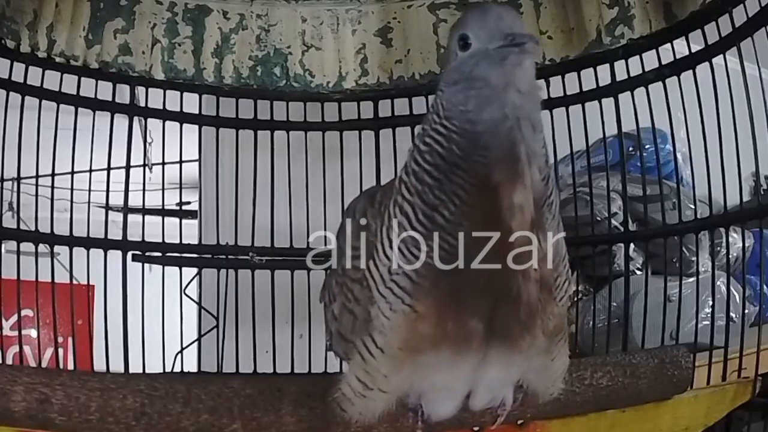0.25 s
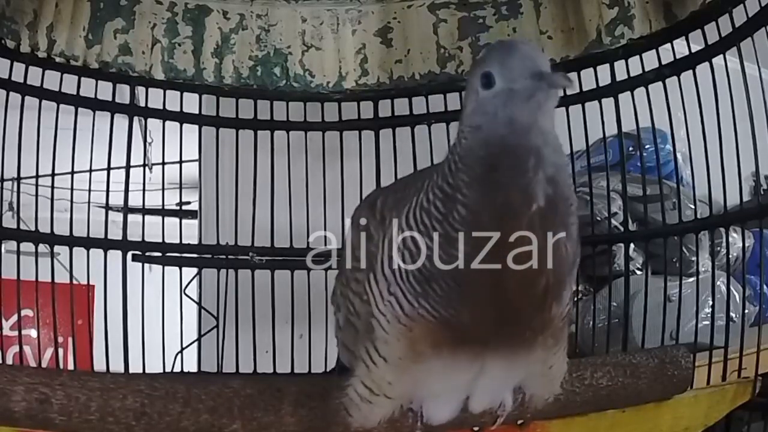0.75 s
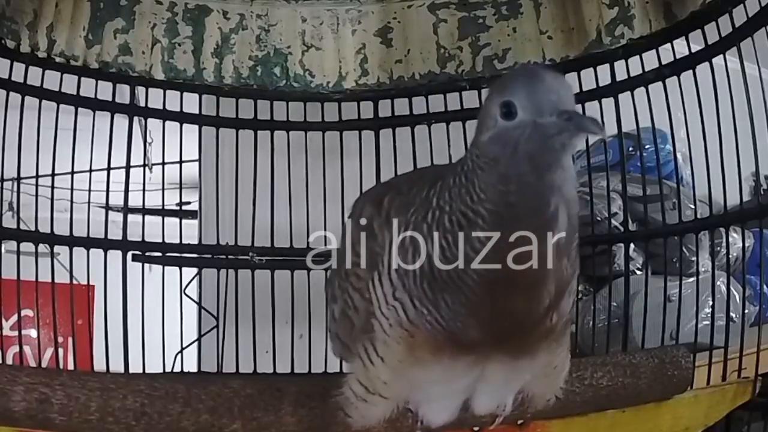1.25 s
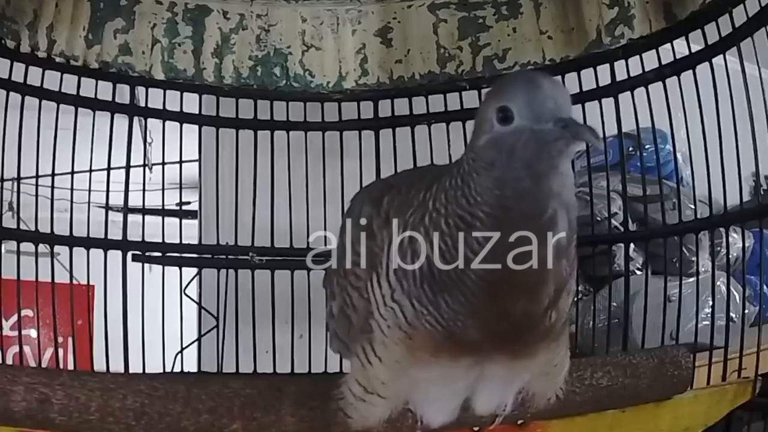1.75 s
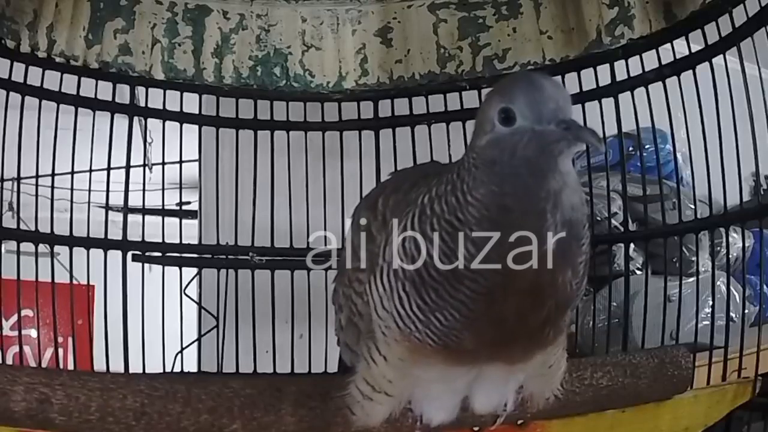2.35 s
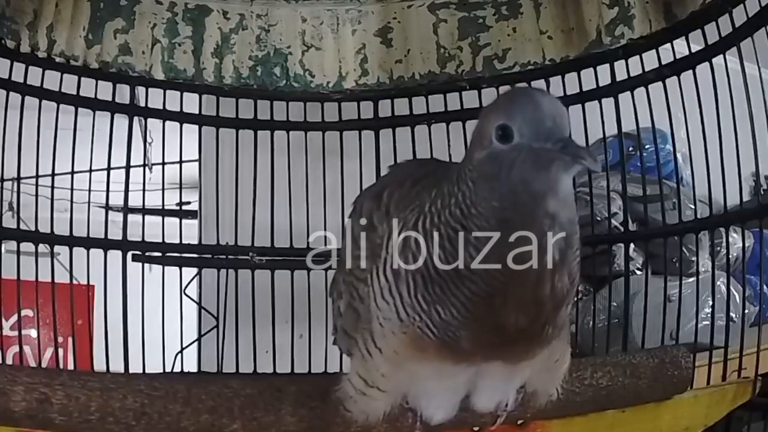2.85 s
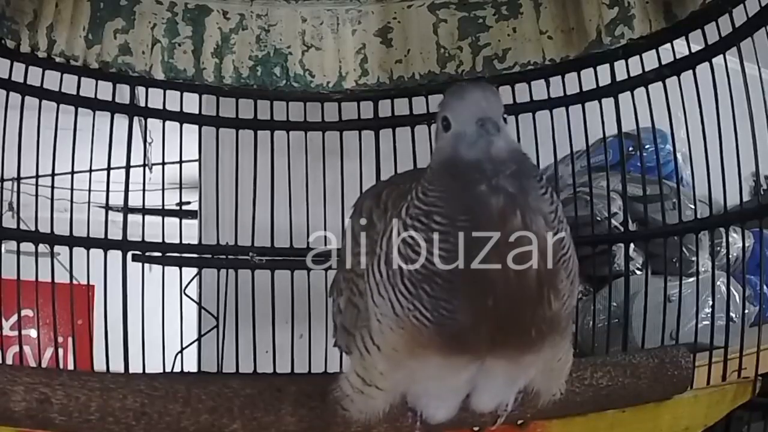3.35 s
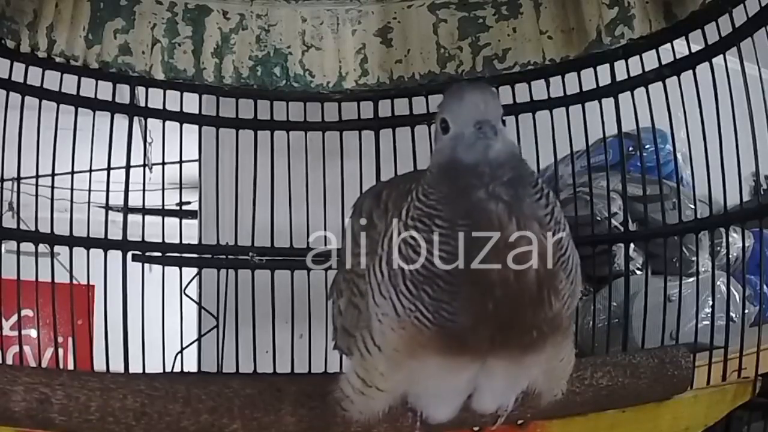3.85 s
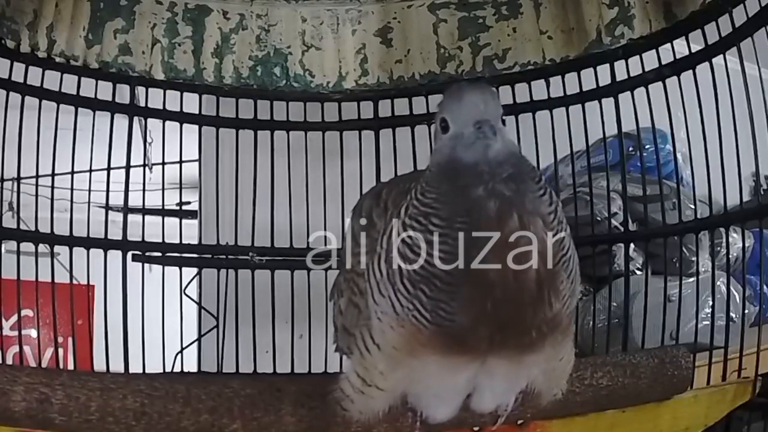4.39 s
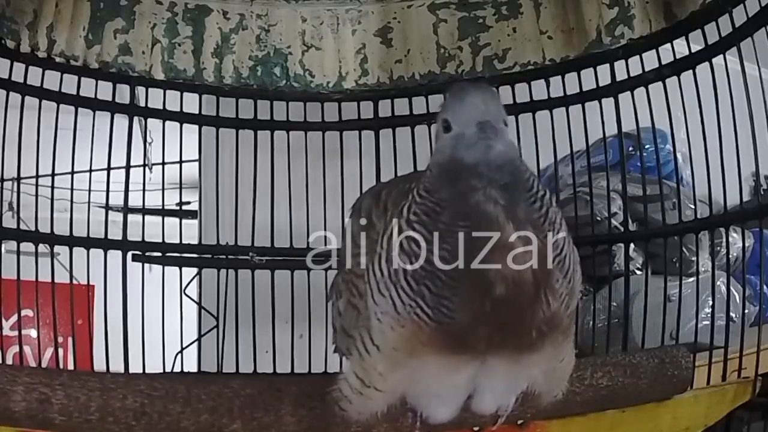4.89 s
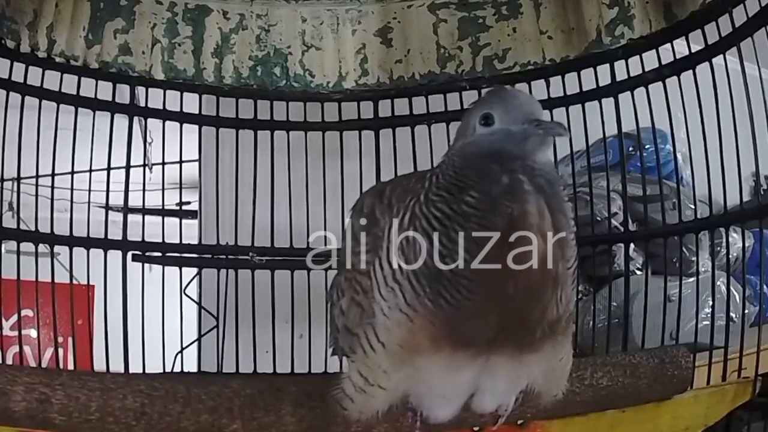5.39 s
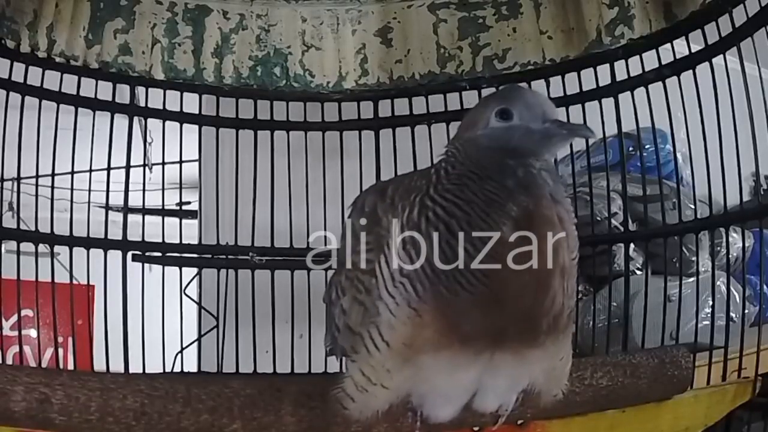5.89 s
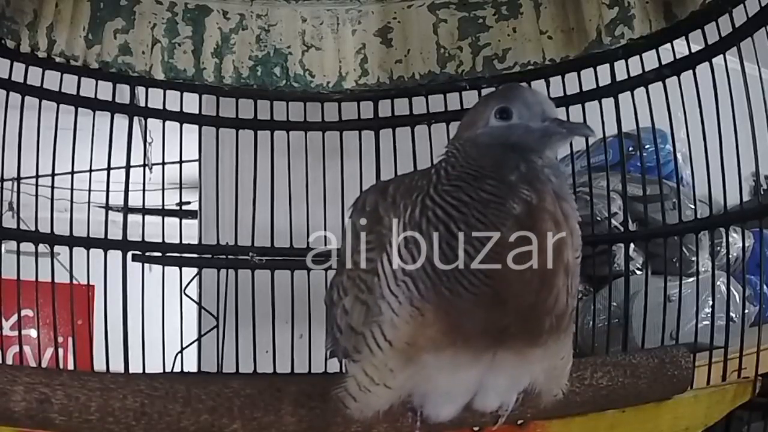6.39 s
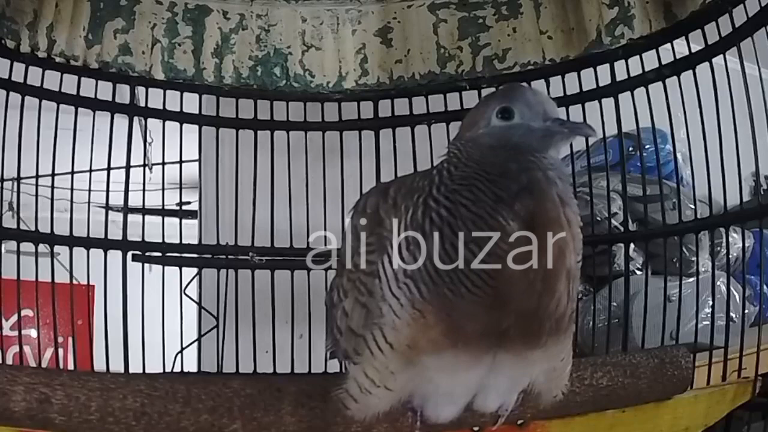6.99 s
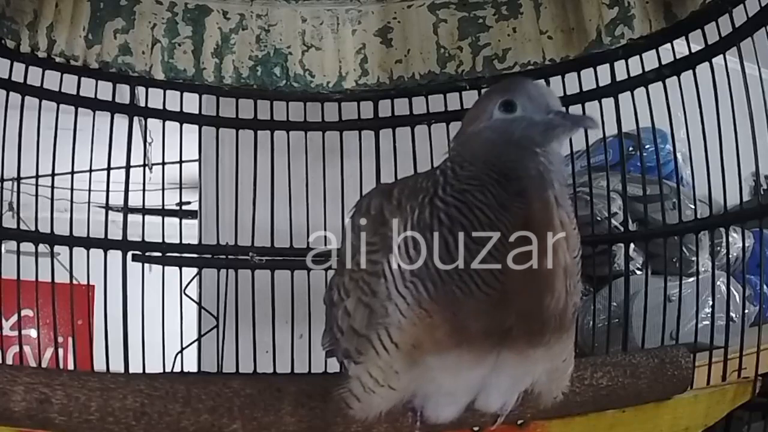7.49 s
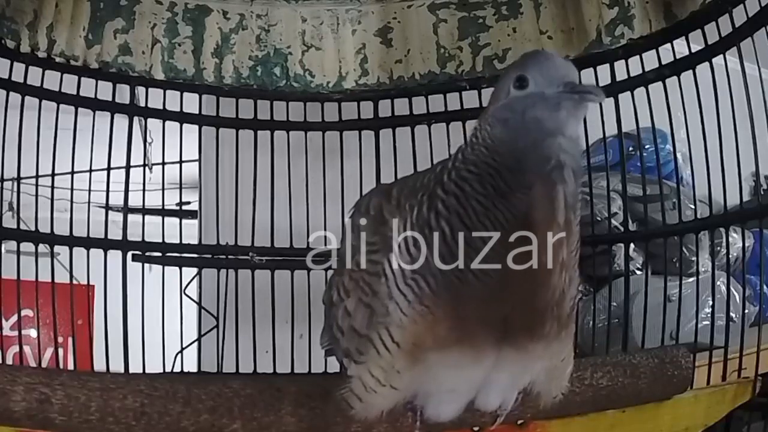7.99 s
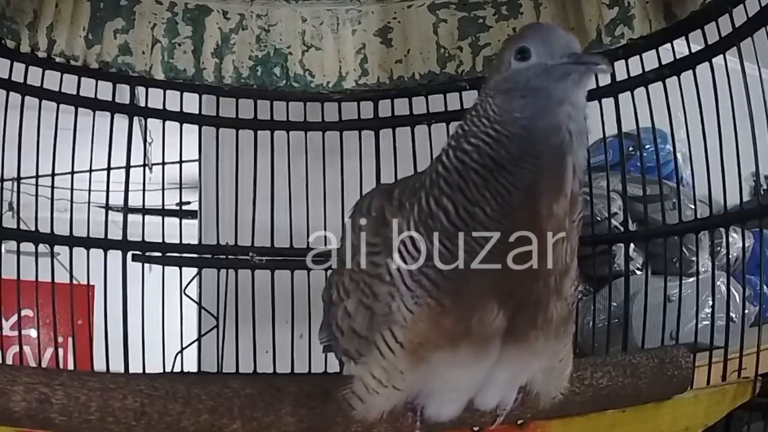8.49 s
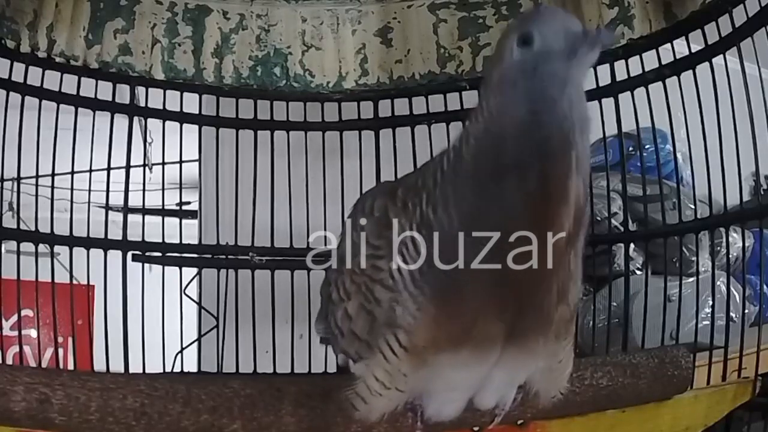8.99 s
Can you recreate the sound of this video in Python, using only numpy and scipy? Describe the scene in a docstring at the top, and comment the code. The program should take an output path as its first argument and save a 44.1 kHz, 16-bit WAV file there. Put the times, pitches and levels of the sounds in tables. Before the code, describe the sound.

A caged dove close to the microphone gives four short round coos and a long one that sinks and fades. Other doves in the echoing yard hoot and stutter, and a nearer one trills twice, each time slowing to a drawn-out note. Low traffic and two motorbikes hum behind; one fades, a heavy vehicle rumbles past, the other pulls away. A single loud coo ends it.

```python
"""Traffic hums and two motorbikes run from the start, while doves hoot and stutter across a walled yard.
A caged zebra dove coos close by, four short notes and a long sinking one; a far small bird whistles.
A second dove nearby trills twice, one motorbike fades, a heavy vehicle rumbles past, the other pulls away.
A faint treble hiss rises and falls before a last coo. Birds are jittered tones, engines sums of firing-rate
multiples, tyres, feathers and hiss shaped noise; echoes give distance, a limiter ducks all under loud coos."""
import sys
import numpy as np
from scipy import signal
from scipy.fft import rfft, irfft, next_fast_len
from scipy.io import wavfile
from scipy.ndimage import uniform_filter1d, map_coordinates

SR = 44100
rng = np.random.default_rng(int(sys.argv[2]) if len(sys.argv) > 2 else 0)


def put_to_file(sound):
    """Save the sound as 16-bit audio at rate SR, in the file named by the first command-line argument."""
    columns = np.atleast_2d(sound).T  # one column per channel
    safe = np.clip(columns, -1, 1)
    whole_steps = np.round(safe * 32767)
    wavfile.write(sys.argv[1], SR, whole_steps.astype(np.int16))


N = 407475


def amp(db):
    """Decibels to gain."""
    return 10 ** (np.asarray(db) / 20)


def unit(x):
    """x at rms 1."""
    return x / np.sqrt(np.mean(x ** 2) + 1e-20)


def along(points, hz):
    """Interpolate (frequency [Hz], value) points on a log-frequency axis."""
    f, v = np.transpose(points)
    return np.interp(np.log(hz + 1), np.log(f + 1), v)


def curves(rows):
    """One value per sample for each column after the time."""
    s, *cols = np.transpose(rows)
    return [np.interp(np.arange(N) / SR, s, c) for c in cols]


def wobble(rate, size=N):
    """A smooth random curve, rate knots a second."""
    knots = rng.standard_normal(int(size * rate / SR) + 4)
    coarse = np.arange(0, size + 32, 32)
    smooth = map_coordinates(knots, [coarse * rate / SR])
    return np.interp(np.arange(size), coarse, smooth)


def bell(at, half):
    """A bell-shaped curve around a time, 1/e at half seconds either side."""
    return np.exp(-((np.arange(N) / SR - at) / half) ** 2)


def filtered(x, response):
    """x times a response of frequency."""
    m = next_fast_len(N + SR // 2)
    return irfft(rfft(x, m) * response(np.fft.rfftfreq(m, 1 / SR)), m)[..., :N]


def add(track, start, sound):
    """Mix a sound into a track at a time."""
    at = round(start * SR) + np.arange(len(sound))
    inside = (at >= 0) & (at < N)
    track[at[inside]] += sound[inside]


# left-right likeness of diffuse noise: (frequency [Hz], correlation [-1..1])
LIKENESS = [(100, 1), (1000, 0.99), (2200, 0.99), (3200, 0.54), (4800, 0.019), (9000, 0.04)]


def rush(spectrum):
    """Stereo noise of rms 1, alike in both ears in the bass: mid and side share the power."""
    def mid_side(hz):
        turn = np.arccos(np.clip(along(LIKENESS, hz), -1, 1)) / 2
        return amp(along(spectrum, hz)) * np.array([np.cos(turn), np.sin(turn)])
    mid, side = filtered(rng.standard_normal((2, N)), mid_side)
    return unit(np.array([mid + side, mid - side]))


def note(length, first_hz, last_hz, scoop, rise, bend, fall, attack, release):
    """Time, pitch and loudness: pitch scoops up as pressure builds and bends as the note is let go."""
    t = np.arange(int(max(length, .01) * SR)) / SR
    left = t[-1] - t
    bends = 1 - scoop * np.exp(-t / rise) + bend * np.exp(-left / fall)
    pitch = np.linspace(first_hz, last_hz, len(t)) * bends
    opening = np.sin(np.pi / 2 * np.minimum(t / attack, 1))
    closing = np.sin(np.pi / 2 * np.minimum(left / release, 1))
    return t, pitch, (opening * closing) ** 2


def arch(length, low_hz, peak_hz, last_hz, climb, sinking, attack, release):
    """Time, pitch and loudness of a note that lingers low, climbs to a peak and sinks again."""
    t, _, gate = note(length, peak_hz, peak_hz, 0, 1, 0, 1, attack, release)
    below = np.exp(-(2 * t / max(climb, .002)) ** 2)
    sunk = np.clip((t - climb) / max(t[-1] - climb, .005), 0, 1) ** sinking
    pitch = peak_hz + (low_hz - peak_hz) * below + (last_hz - peak_hz) * sunk
    return t, pitch, gate


def syrinx(pitch, tone, jitter, effort=1):
    """A tone of rms 1 with a slight tremor; effort brings out its faint, unsteady overtones."""
    flutter_db = 1.5
    size = len(pitch)
    phase = 2 * np.pi * np.cumsum(pitch * (1 + jitter * wobble(250, size))) / SR
    overtones = sum(amp(db + flutter_db * wobble(40, size)) * np.sin(order * phase)
                    for order, db in enumerate(tone, 2))
    return np.sqrt(2) * (np.sin(phase) + effort * overtones)


def ping(hz, width, life):
    """A short burst of noise around hz that swells for life seconds and dies."""
    t = np.arange(SR // 10) / SR
    in_phase = wobble(width, len(t)) * np.sin(2 * np.pi * hz * t)
    quadrature = wobble(width, len(t)) * np.cos(2 * np.pi * hz * t)
    return (in_phase + quadrature) * t / life * np.exp(1 - t / life)


# noise spectra, relative, of engine rumble, tyres and a heavy engine: (frequency [Hz], level [dB])
RUMBLE_SPECTRUM = [(15, -39.5), (30, -17), (56, -0.5), (120, 1.5), (185, 0.5), (215, -2), (245, -0.5),
                   (320, -3), (380, -10), (600, -13), (900, -57.5)]
TYRE_SPECTRUM = [(250, -18), (450, 1), (550, 5), (900, 3), (1500, -7.5), (2100, -9), (2700, -13),
                 (3250, -21.5), (3800, -22.5), (4300, -28.5), (6000, -33), (9500, -37.5), (12500, -50.5),
                 (15000, -66.5)]
HEAVY_SPECTRUM = [(25, -30), (55, 12), (85, 9.5), (140, -12), (250, -46.5)]
# slow changes in traffic noise: (centre [s], half width [s], rumble change [dB], tyre change [dB])
TRAFFIC_CHANGES = [(1.104, 0.74, 0, 3), (5.5, 0.86, 6, 4.5), (6.7, 2.8, -1, 4), (8.85, 0.5, 8.5, 4.5)]


def street():
    """Engine rumble and tyre noise slowly change in level; a heavy vehicle passes slowly."""
    rumble_db = -36 + 2.1 * wobble(8.8)
    tyre_db = -44 + 1.5 * wobble(7.8)
    for at_s, half_s, rumble_change_db, tyre_change_db in TRAFFIC_CHANGES:
        rumble_db += rumble_change_db * bell(at_s, half_s)
        tyre_db += tyre_change_db * bell(at_s, half_s)
    heavy = amp(-38.5) * bell(at=6.1, half=3.5) * rush(HEAVY_SPECTRUM)
    return amp(rumble_db) * rush(RUMBLE_SPECTRUM) + amp(tyre_db) * rush(TYRE_SPECTRUM) + heavy


FIRING_SCATTER_CYCLES, THROB_DB = .0025, .7  # unevenness of the firings in time and strength


def exhaust(rate, tones_db, fading_db):
    """Multiples of an uneven firing rate; each tone fades slowly as the path changes."""
    turns = np.cumsum(rate * (1 + .001 * wobble(6))) / SR + FIRING_SCATTER_CYCLES * wobble(25)
    tones = 0
    for multiple, db in tones_db:
        level_db = db + fading_db * wobble(2.0) + THROB_DB * wobble(12)
        tones = tones + amp(level_db) * np.sin(2 * np.pi * multiple * turns + rng.normal(0, 0.71))
    return np.sqrt(2) * amp(THROB_DB * wobble(25)) * tones


# engine speed: (time [s], firing rate [1/s])
FAR_FIRING_RATE = [(0, 36.4), (2.2, 37.4), (3.2, 37.9), (5.2, 37)]
# loudness: (time [s], level [dB])
FAR_LOUDNESS = [(0, -37.5), (1, -34), (2.2, -35), (3.2, -49.5), (4.3, -41), (5.2, -53.5)]
# exhaust tones from twice the firing rate up, relative: level [dB]
FAR_EXHAUST_TONES = [-20, -16.5, -9, -5.5, -10, -14.5, -15, -21.5, -19]


def far_motorbike():
    """A steady engine, a stack of firing-rate multiples, fades away down the street."""
    (rate,), (db,) = curves(FAR_FIRING_RATE), curves(FAR_LOUDNESS)
    tones = [(k, db + tone_db) for k, tone_db in enumerate(FAR_EXHAUST_TONES, 2)]
    return exhaust(rate, tones, fading_db=2.5)


# engine speed, idling then pulling away: (time [s], firing rate [1/s])
NEAR_FIRING_RATE = [(0, 24.6), (2.6, 25.2), (4.2, 25.2), (4.9, 25.6), (5.8, 25.8), (6.2, 25.2),
                    (7.1, 24.85), (7.48, 25.1), (8.19, 27.1), (8.41, 28.1), (8.97, 29.3), (9.24, 30.2)]
# two strongest tones: (time [s], sixth multiple level [dB], seventh multiple level [dB])
NEAR_STRONG_TONES = [(0, -46.5, -50.5), (.7, -40.5, -53.5), (1.3, -44.5, -49), (2.7, -37.5, -51),
                     (3.1, -49, -53.5), (4.2, -40, -52.5), (5.4, -38.5, -37), (5.85, -45, -35),
                     (6.3, -44.5, -29), (6.82, -30.5, -33.5), (7.45, -27, -24), (8.18, -34.5, -22.5),
                     (8.41, -30, -27), (8.98, -27.5, -29), (9.24, -37, -44)]
# exhaust pipe resonances: (frequency [Hz], gain [dB])
NEAR_PIPE_RESONANCES = [(50, -7.5), (75, -8.5), (100, -6.5), (125, 1), (200, -5), (225, -9.5), (252, -2),
                        (278, -8.5), (305, -0.5), (330, -2), (365, -15.5), (425, -18), (468, -9),
                        (510, -15.5)]


def near_motorbike():
    """Two strong tones; weaker ones slide through fixed pipe resonances as the engine speeds up."""
    (rate,), (sixth_db, seventh_db) = curves(NEAR_FIRING_RATE), curves(NEAR_STRONG_TONES)
    loud_db = 10 * np.log10(amp(sixth_db) ** 2 + amp(seventh_db) ** 2)
    weak_db = -40 + .55 * (loud_db - loud_db.max())  # weak tones follow part of the swell
    strong = [(6, sixth_db), (7, seventh_db)]
    weak = [(k, weak_db + along(NEAR_PIPE_RESONANCES, k * rate))
            for k in range(2, 20) if k not in (6, 7)]
    return exhaust(rate, strong, fading_db=0.96) + exhaust(rate, weak, fading_db=3.5)


# level hoots, and level stretches within a falling coo and a slur:
# (start [s], length [s], pitch [Hz], level [dB])
LEVEL_NOTES = [(-.1, 0.14, 1146, -19.5), (-.05, 0.24, 928, -28.5), (0.814, 0.038, 1010, -12),
               (.97, .06, 846, -28.5), (1.11, 0.1, 851, -16.5), (1.403, .035, 1052, -22),
               (1.664, 0.13, 906.5, -23), (2.11, 0.15, 1156, -24.5), (3.258, 0.057, 823, -23.5),
               (3.394, .11, 839, -17.5), (4.54, 0.08, 912, -23), (4.779, 0.043, 907, -23),
               (4.99, 0.021, 905, -24), (5.077, 0.047, 908, -24.5), (5.253, 0.038, 905, -24.5),
               (6.133, 0.047, 818, -22.5), (6.275, 0.087, 841.7, -15.5), (6.347, 0.034, 967, -21),
               (6.421, .065, 1062, -21.5), (6.607, 0.033, 905, -26.5), (6.704, 0.2, 911, -26)]
# slow upward slurs: (start [s], climb time [s], hold [s], peak pitch [Hz], level [dB])
UPWARD_SLURS = [(1.788, 0.04, 0.12, 1160, -23.5), (1.999, .07, .125, 1059, -20),
                (6.335, 0.038, 0.041, 1122, -29.5), (7.06, 0.1, 0.11, 1059, -22),
                (8.751, 0.13, 0.086, 1065, -22)]


def single_notes():
    """Slurs climb slowly to their pitch, level notes start on it; both sag a little."""
    slur_low_hz, sag = 848, 0.034  # sag: share of the pitch lost
    for start, climb, hold, hz, db in UPWARD_SLURS:
        yield start, climb + hold, slur_low_hz, hz, hz * (1 - sag), climb, db
    for start, length, hz, db in LEVEL_NOTES:
        yield start, length, hz, hz, hz * (1 - sag), 0, db


def two_registers(t, high, length, low_hz, peak_hz, climb):
    """The low register creeps up and swells, then flips to the high one with a brief flare."""
    high = high * (1 - 0.075 * np.exp((t - t[-1]) / 0.012))  # drops as the note is let go
    low = low_hz + 0.42 * (peak_hz - low_hz) * np.minimum(t / climb, 1.2)
    # the slower the climb, the fainter the low register
    low_db = 2.5 - 59.5 * climb + 49 * np.minimum(t - climb, 0)

    def flip(at):
        return (1 + np.tanh((t - at) / (0.24 * climb))) / 2

    overlap_s = 0.0081  # the low register outlasts the flip
    upper = flip(climb) * syrinx(high, [], jitter=0.0044)
    lower = (1 - flip(climb + overlap_s)) * amp(low_db) * syrinx(low, [], jitter=0.018)
    flare_db = 3.5 * np.exp(-((t - climb) / 0.0019) ** 2)
    crest_db = 13 * length * np.exp(-((t / length - .62) / 0.073) ** 2)  # longer notes swell more
    return (upper + lower) * amp(flare_db + crest_db)


# stuttering phrases: (start [s], length [s], starting pitch [Hz], peak pitch [Hz],
# last pitch before letting go [Hz], climb time [s], level [dB])
STUTTER_NOTES = [(1.135, 0.076, 880, 1227, 1185, .05, -19.5), (1.205, 0.024, 1057, 1240, 1173, 0.012, -27),
                 (1.24, 0.041, 976, 1198, 1145, 0.016, -24.5), (1.29, 0.052, 917, 1152, 1090, 0.018, -23.5),
                 (1.365, 0.056, 946, 1155, 1090, 0.023, -21.5),
                 (1.45, 0.067, 871, 1174, 1140, 0.034, -21.5), (1.57, 0.14, 869, 1202, 1118, 0.033, -26),
                 (4.452, 0.064, 909, 1223, 1170, .042, -19), (4.513, 0.031, 1045, 1225, 1172, 0.011, -28),
                 (4.548, 0.033, 976, 1214, 1170, 0.015, -24.5),
                 (4.597, 0.048, 970, 1175, 1164, 0.013, -23.5), (4.66, 0.046, 918, 1168, 1100, 0.023, -22),
                 (4.748, 0.048, 900, 1174, 1110, 0.026, -21.5), (4.858, 0.056, 909, 1175, 1163, 0.022, -21),
                 (4.988, 0.13, 927, 1189, 1133, .026, -22.5)]
# long falling coos: columns as above
FALLING_COOS = [(0.683, .2, 850, 1084, 925, 0.052, -20.5), (2.956, 0.23, 812, 1025, 860, 0.034, -18.5),
                (5.82, .24, 804, 1032, 869, .034, -18)]


def yard_doves():
    """Climbing notes creep up low, flip to a peak and sink; level notes are plain, sagging tones."""
    out = np.zeros(N)
    for start, length, low_hz, peak_hz, last_hz, climb, db in [
            *STUTTER_NOTES, *FALLING_COOS, *single_notes()]:
        if climb:
            attack, release = .008, 0.0046 + 0.12 * length
        else:
            attack = release = 0.36 * length
        t, high, gate = arch(length, peak_hz, peak_hz, last_hz, climb, 2.4, attack, release)
        if climb:
            voice = two_registers(t, high, length, low_hz, peak_hz, climb)
        else:
            voice = syrinx(high, [], jitter=0.003)
        add(out, start, amp(db + 0.61 * wobble(45, len(t))) * gate * voice)
    return out


# feather rustles, and last a faint steady treble hiss, rising and falling around 8.3 s:
# (time [s], half width [s], level [dB])
RUSTLES_AND_HISS = [(0.137, 0.12, -55), (3.78, .065, -52), (5.07, 0.14, -59.5), (8.298, 0.9, -58)]
# their noise spectrum, relative: (frequency [Hz], level [dB])
RUSTLE_SPECTRUM = [(1200, -6), (2500, 5), (4500, -9.5), (9000, -15), (14000, -30)]
# taps on the cage: (time [s], pitch [Hz], level [dB])
CAGE_TAPS = [(2.33, 2665, -62.5), (6.68, 2150, -40.5), (6.73, 1900, -45), (7.93, 7490, -71),
             (8.04, 8500, -68)]


def cage():
    """Feathers brush softly and a treble hiss rises, both shaped noise; something taps the bars."""
    taps = np.zeros(N)
    envelope = sum(amp(db) * bell(s, half) for s, half, db in RUSTLES_AND_HISS)
    for s, hz, db in CAGE_TAPS:
        add(taps, s, amp(db) * ping(hz, width=0.45 * hz, life=0.013))
    return taps + envelope * amp(3.0 * wobble(75)) * rush(RUSTLE_SPECTRUM)


# coos: (start [s], end [s], first pitch [Hz], last pitch before the bend [Hz],
# closing bend [share of pitch], level [dB], fade [dB], opening chirp re coo [dB])
NEAR_COOS = [(0.553, 0.818, 735, 726.7, -0.22, -4.5, -1, -17),
             (1.009, 1.118, 717.8, 730, -0.24, -5.5, -1, -15.5),
             (1.255, 1.374, 722, 726, -0.24, -4.5, -0.5, -19),
             (1.522, 1.664, 726, 709.4, -0.17, -4.5, -2.5, -18),
             (1.822, 2.62, 718, 639.8, 0.23, -1, -15, -25.5),
             (9.018, 9.303, 739.5, 719, -0.28, -4, -2.5, -17.5)]
# coo overtones from the second harmonic up, at full effort: level re fundamental [dB]
COO_OVERTONES = [-42.5, -62, -61.5, -62, -70, -72, -71]


def near_dove():
    """Round coos: a tiny upward chirp, then the low tone catches with a puff of air."""
    out = np.zeros(N)
    for start, end, first_hz, last_hz, bend, db, fade_db, chirp_db in NEAR_COOS:
        t, pitch, gate = note(end - start, first_hz, last_hz, scoop=0.067, rise=0.019,
                              bend=bend, fall=.012, attack=0.018, release=0.032)
        pitch = pitch * (1 - 0.35 * np.exp(-t / 0.0045))  # membranes catch from well below the note
        effort = amp(fade_db * (t / t[-1]) ** 1.8)
        overtone_effort = amp(0.36 * fade_db) * effort ** 13.0
        voice = syrinx(pitch, COO_OVERTONES, jitter=0.0024, effort=overtone_effort)
        add(out, start, amp(db + 0.41 * wobble(40, len(t))) * effort * gate * voice)

        t, pitch, gate = note(0.031, 740, 1150, scoop=0.035, rise=0.0048,
                              bend=0, fall=.005, attack=0.0074, release=0.014)
        add(out, start - .011, amp(db + chirp_db) * gate * syrinx(pitch, [], jitter=0.11))
        add(out, start, amp(db - 53.5) * ping(3000, width=2200, life=0.0081))  # puff
    return out


def hoarseness(start, end, hz, db):
    """The first coo turns briefly hoarse as it ends: multiples of half its pitch scatter and buzz."""
    out = np.zeros(N)
    t, pitch, gate = note(end - start, hz, hz, scoop=0, rise=.01,
                          bend=0, fall=.01, attack=0.035, release=0.017)
    phase = 2 * np.pi * np.cumsum(pitch * (1 + .014 * wobble(330, len(t)))) / SR
    halves = sum(np.sin(k * phase / 2) / k ** 1.5 for k in range(4, 11))
    add(out, start, amp(db) * gate * unit(halves * amp(3 * wobble(300, len(t)))))
    return out


# far small bird: (start [s], end [s], pitch [Hz], level [dB])
FAR_WHISTLES = [(0.847, 0.935, 1948, -41), (1.204, 1.303, 1832, -36), (1.3, 1.389, 1784, -44.5),
                (1.513, 1.731, 1717, -42), (1.887, 1.944, 1790, -42.5)]


def whistler():
    """Thin level whistles, each a single jittered tone."""
    out = np.zeros(N)
    for start, end, hz, db in FAR_WHISTLES:
        t, pitch, gate = note(end - start, hz, hz, scoop=0.012, rise=0.0086,
                              bend=-0.01, fall=0.012, attack=0.016, release=0.047)
        add(out, start, amp(db) * gate * syrinx(pitch, [], jitter=0.0064))
    return out


# trills: (start [s], wait for the closing note [s], level before flare [dB])
DOVE_TRILLS = [(2.385, .543, -19.5), (5.373, .513, -21)]
# chips of every trill, slowing down: (delay [s], length [s], starting pitch [Hz], last pitch [Hz])
TRILL_CHIPS = [(.003, .05, 916, 1197), (.044, .039, 1177, 1144), (.081, 0.043, 962, 1130),
               (.127, .04, 882, 1062), (.183, .037, 900, 1050), (.271, 0.036, 900, 1050),
               (.371, 0.046, 866, 1055)]
# trill overtones from the second harmonic up, at full effort: level re fundamental [dB]
TRILL_OVERTONES = [-41, -51, -62, -53, -65.5, -58]


def trilling_dove():
    """Arched chips start with a rasp and flare as the rising pitch crosses the throat's resonance."""
    out = np.zeros(N)
    throat_hz, width_hz, flare_db = 1030, 110, 10
    for start, wait, db in DOVE_TRILLS:
        closing = (wait, .122, 843, 1140)  # drawn-out last note, columns as the chips
        for k, (delay, length, low_hz, last_hz) in enumerate([*TRILL_CHIPS, closing]):
            # the fastest chips are pushed a little higher
            peak_hz = 1325 + 32.2 * np.exp(-((delay - 0.05) / 0.066) ** 2)
            t, pitch, gate = arch(length, low_hz, peak_hz, last_hz, climb=.015 + 0.062 * length,
                                  sinking=3.2, attack=0.004, release=0.0052)
            flare = flare_db * np.exp(-((pitch - throat_hz) / width_hz) ** 2 - t / 0.023)
            effort = np.minimum(pitch / peak_hz, 1) ** 7
            voice = syrinx(pitch, TRILL_OVERTONES, jitter=0.0055, effort=effort)
            add(out, start + delay, amp(db + flare) * gate * voice)

            rasp_db = db + (-8.5 if k else 2)  # the first rasp is strongest
            add(out, start + delay - .011, amp(rasp_db) * ping(1150, width=800, life=0.0055))
            add(out, start + delay, amp(rasp_db - 19) * ping(2500, width=5400, life=0.0027))
    return out


# brief far engines: (loudest at [s], half width [s], pitch [Hz], level [dB])
ENGINE_DRONES = [(3.458, 0.079, 337, -37.5), (4.245, 0.49, 121.1, -34.5), (4.85, 0.081, 185, -35),
                 (5.147, 0.6, 315, -36.5), (5.45, .15, 284, -37.5)]


def drones():
    """Of a far engine only one wavering exhaust tone carries."""
    out = np.zeros(N)
    for at_s, half_s, hz, db in ENGINE_DRONES:
        phase = 2 * np.pi * np.cumsum(hz * (1 + 0.011 * wobble(13))) / SR
        out += amp(db) * bell(at_s, half_s) * unit(np.sin(phase))
    return out


# decay of the diffuse echo: (frequency [Hz], t60 [s])
WALL_DECAY = [(300, 0.69), (1000, 0.47), (3000, 0.18), (10000, .15)]


def echoes(x, delay):
    """The walls' diffuse answer: decaying noise, the treble dying first."""
    hz, t, z = signal.stft(rng.standard_normal(SR // 2), SR, nperseg=256)
    decay = amp(-60 * t / along(WALL_DECAY, hz)[:, None])
    tail = signal.istft(z * decay, SR, nperseg=256)[1]
    tail = np.pad(tail, (int(delay * SR), 0))
    voice_band = np.abs(rfft(tail, SR)[600:1400])  # 1 Hz bins; sets unit gain for voices
    return signal.fftconvolve(x, tail / np.sqrt(np.mean(voice_band ** 2)))[:N]


# hard walls of the yard: (echo delay [s], gain [linear])
WALL_SLAPS = [(0.0137, 0.24), (.022, -.2), (.033, .16), (.047, 0.21), (.061, -0.2), (.094, 0.058)]


def slapped(x):
    """Hard walls repeat a sound; on a sliding note the copies beat against one another."""
    out = x.copy()
    for delay, gain in WALL_SLAPS:
        add(out, delay, gain * x)
    return out


def placed(x, balance_db, lag):
    """A sound from one side: the left channel is balance_db louder and lag seconds later."""
    def response(hz):
        gains = amp([[balance_db / 2], [-balance_db / 2]])
        return gains * np.exp(np.pi * hz * lag * np.array([[-1j], [1j]]))
    return filtered(x, response)


def scene():
    """The farther the bird, the more of it arrives by way of the walls."""
    traffic = street() + far_motorbike() + near_motorbike() + drones()
    far = yard_doves() + whistler()
    near = near_dove() + hoarseness(.715, 0.797, hz=722, db=-43)
    trill = trilling_dove()
    near = near + amp(-20) * echoes(near, delay=0.0072)
    trill = trill + amp(-16) * echoes(trill, delay=0.0058)
    far = amp(-1.5) * slapped(far) + amp(-8) * echoes(far, delay=0.0093)
    birds = placed(near, 1.8, lag=0) + placed(trill + far, 1.2, lag=2e-5)
    return birds + placed(traffic, 1.1, lag=3.5e-5) + cage()


def limiter(x, ceiling_db, recovery_db):
    """Gain drops on a loud peak, smoothed over 256 samples, and recovers by recovery_db a second."""
    over = np.maximum(20 * np.log10(np.abs(x).max(axis=0) + 1e-9) - ceiling_db, 0)
    ramp = recovery_db * np.arange(N) / SR
    held = np.maximum.accumulate(over + ramp) - ramp
    return x * amp(-uniform_filter1d(held, size=256))


def record(dry):
    """Limiter, then a sharp treble cutoff."""
    top_hz = 15100
    return filtered(limiter(dry, ceiling_db=-4, recovery_db=13.0), lambda hz: hz < top_hz)


dry = scene()
out = record(dry)
put_to_file(out)
```